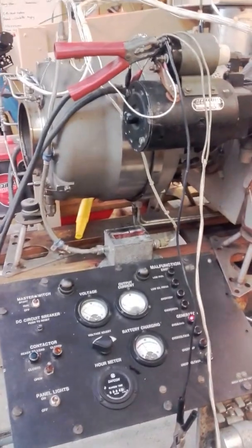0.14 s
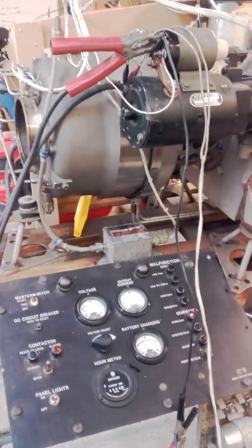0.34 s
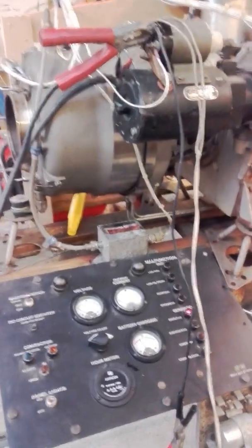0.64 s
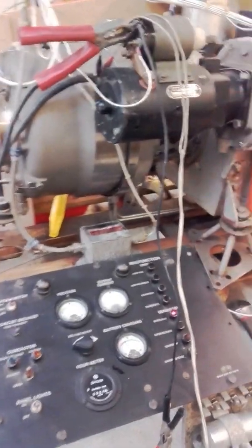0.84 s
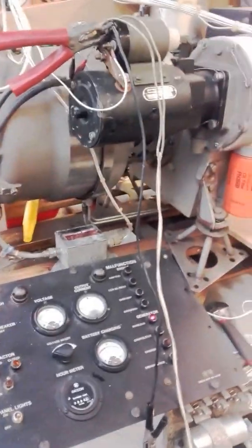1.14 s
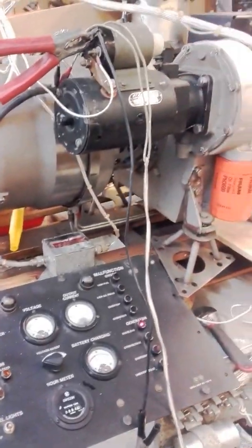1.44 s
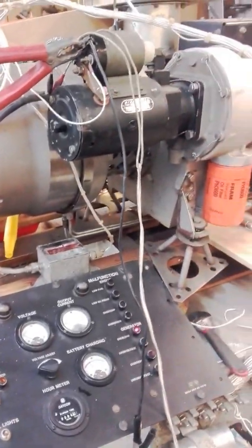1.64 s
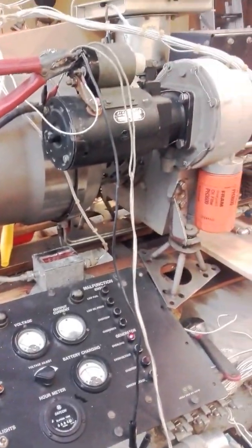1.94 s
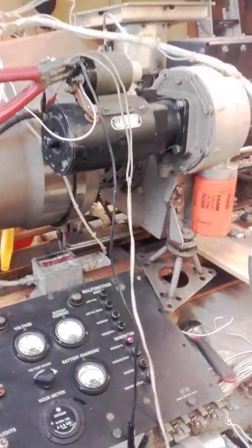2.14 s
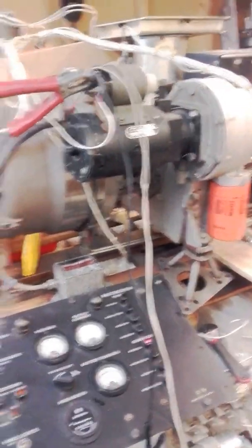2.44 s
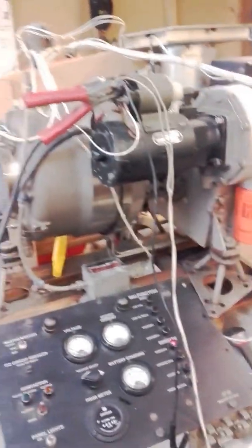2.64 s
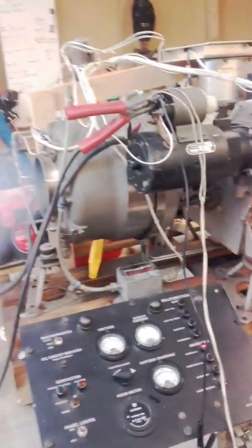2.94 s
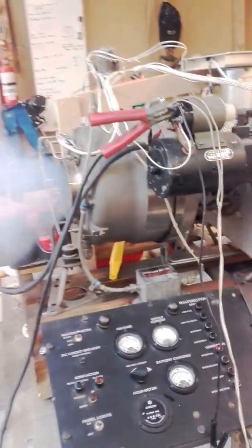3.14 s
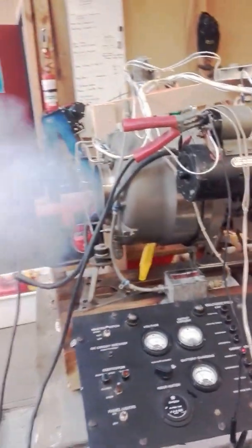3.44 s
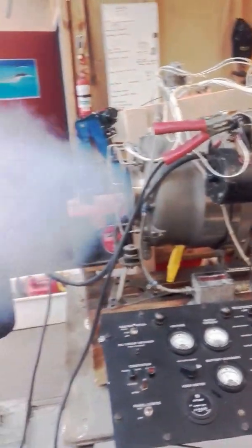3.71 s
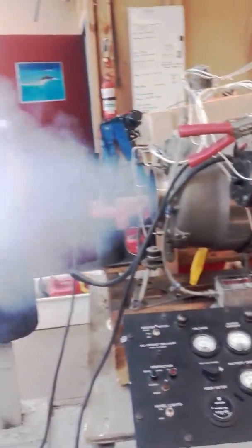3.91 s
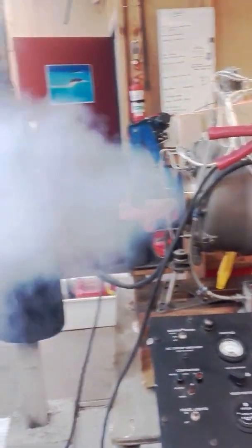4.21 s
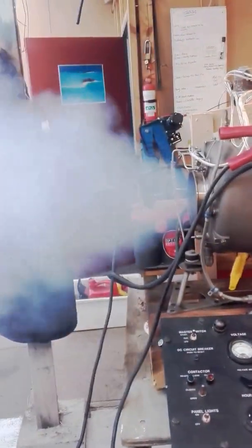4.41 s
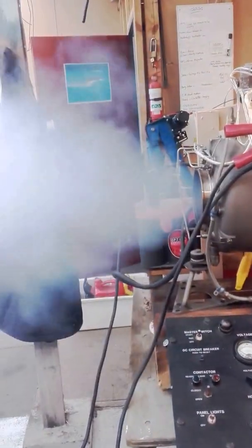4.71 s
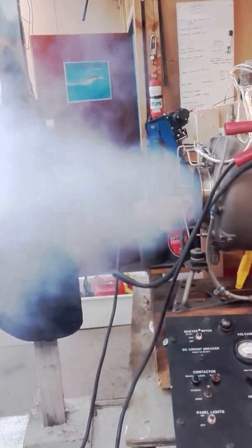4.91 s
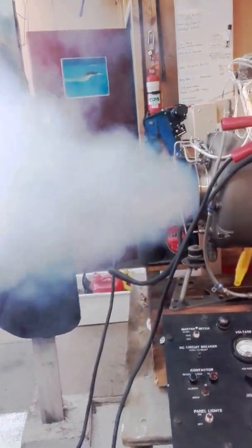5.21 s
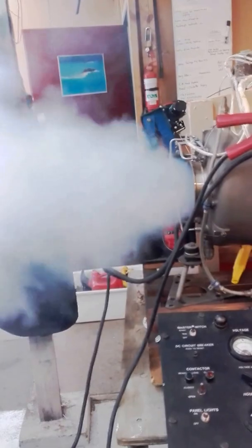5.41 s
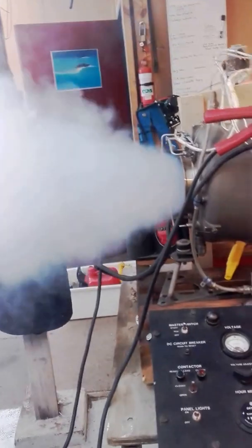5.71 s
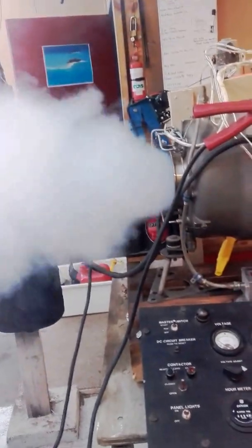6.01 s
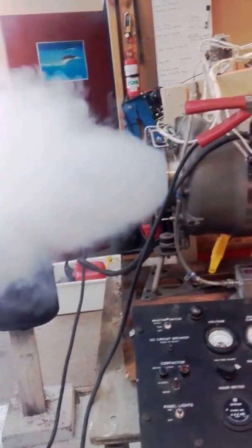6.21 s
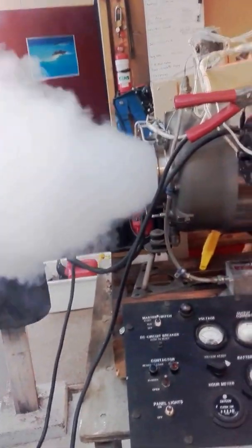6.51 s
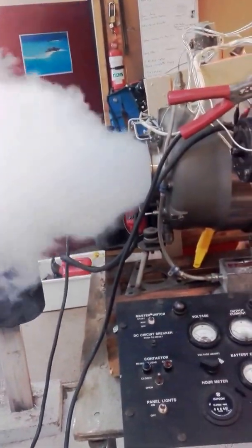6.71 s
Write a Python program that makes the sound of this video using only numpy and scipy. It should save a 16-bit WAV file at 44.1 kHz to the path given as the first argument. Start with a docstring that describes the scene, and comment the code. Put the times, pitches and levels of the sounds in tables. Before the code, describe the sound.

A small gas turbine winds down in a workshop, its high whine falling and fading over rushing air and a brief gear rattle.

```python
"""A small gas turbine coasts down in a workshop, close to the microphone.
From the start its rotor whines on a falling pitch, with overtones and gear tones; wall echoes make them
flutter, and air rushes through fixed duct resonances. The whine is loudest near 1.3 s. The unloaded
gear teeth rattle most near 3 s, as the microphone moves toward the exhaust and the rush turns hollow.
The rush dulls and fades; faint dry ticks sound in the last second."""
import sys
import numpy as np
from scipy import signal
from scipy.fft import rfft, irfft
from scipy.io import wavfile
from scipy.ndimage import uniform_filter1d, minimum_filter1d

SR = 44100
rng = np.random.default_rng(int(sys.argv[2]) if len(sys.argv) > 2 else 0)


def pcm_store(signal):
    """Save signal as 16-bit PCM."""
    levels = np.round(np.clip(np.atleast_2d(signal), -1, 1) * 32767)
    wavfile.write(sys.argv[1], SR, levels.astype(np.int16).T)


N = 302526
TIME_S = np.arange(N) / SR

# Once-per-turn whine. Each row: time in seconds, level in dB.
WHINE_LEVELS = [(0, -16.5), (.62, -13), (.74, -5.5), (.97, -8.5), (1.03, -18.5), (1.2, -4.5), (1.44, -4.8),
                (1.52, -14), (1.7, -20.5), (1.88, -13.5), (2.3, -18.5), (2.46, -16.5), (2.6, -22),
                (2.87, -20.5), (3.0, -26), (3.13, -22), (3.6, -41), (4.22, -37), (4.55, -40), (5.25, -59),
                (5.62, -39), (6.3, -85)]
# Harmonics 2 to 6. Each row: level at top speed in dB, loss in dB per halving of speed.
OVERTONE_LEVELS = [(-37, 18), (-28, 32), (-38.5, 13), (-41, 23), (-52, 23)]
# Resonances that harmonic 2, harmonic 3 and the gear mesh tone fall through.
# Each row: centre in Hz, width in Hz, lift in dB.
SECOND_RESONANCES = [(6010, 190, 10), (5558, 290, 19.5), (4880, 350, 17), (4020, 78, 10.5), (3590, 120, 14),
                     (3170, 134, 18), (2384, 180, 26.5), (2191, 160, 28)]
THIRD_RESONANCES = [(8960, 160, 5), (7820, 260, 7), (5640, 150, 9), (5260, 280, 15)]
MESH_RESONANCES = [(2640, 140, 15), (2213, 320, 23), (1860, 180, 14), (1600, 110, 10), (1420, 680, 9.5)]
# Geared accessories. Each row: multiple of rotor speed, peak time in seconds, swell in seconds, level in dB.
ACCESSORY_TONES = [(.164, 1.7, .25, -48), (.26, 3.9, .3, -56), (.686, 6.4, .4, -57), (.895, .85, .4, -27)]
# Air flow. Each row: time in seconds, roar gain in dB, duct howl gain in dB, hiss gain in dB.
FLOW_GAINS = [(0, 2, 6, 7.5), (1.1, 7, 7.5, 9), (1.8, 7.5, 5, 7.5), (3.3, 4, 3.5, 2.6), (4.7, -2, -2, -5.5),
              (6.86, -11, -12, -15)]
# Smooth spectrum of the air. Each row: frequency in Hz, level in dB.
RUSH_SPECTRUM = [(25, -57), (65, -62), (110, -41.5), (250, -35), (500, -32), (1000, -37), (2000, -22.5),
                 (3200, -35), (4400, -30), (7500, -27), (9300, -30), (11000, -38), (13500, -43),
                 (15500, -40)]
# Ducts and casing. Each row: centre in Hz, width in Hz, lift in dB beside the engine, same at the exhaust.
DUCT_RESONANCES = [(427, 190, 0.5, 5), (610, 114, 4.5, 2.5), (741.6, 127, 12, 16.5), (957, 105, 11, 19),
                   (1180, 174, 16, 12), (1360, 148, 13, 5), (2157, 144, 9, 12.5), (2393, 505, 11, 8),
                   (2907, 480, 9, 3), (3578, 357, 16, 15), (5930, 57, 6, 2), (7150, 270, 6, 1.5),
                   (8910, 1180, 4, 4)]
# Microphone path. Each row: time in seconds, position from 0 (beside the engine) to 1 (exhaust).
MIC_PATH = [(2.5, 0), (3.9, 0.87)]
# Dry ticks. Each row: start in seconds, level in dB.
TICK_EVENTS = [(5.892, -38), (5.93, -46), (6.07, -42), (6.168, -48), (6.222, -51), (6.315, -45),
               (6.35, -52), (6.588, -41), (6.732, -54)]
# Nearest surfaces. Each entry: echo delay in seconds.
ECHO_DELAYS_S = [.009252, .01229, .024376]


def rotor(top_hz=3021, drag_per_s=.1682, friction_per_s2=.00412, wobble=.00015):
    """Drag and friction slow the shaft. Returns speed in Hz, halvings of speed, angle in radians."""
    speed_hz = top_hz * np.exp(-(drag_per_s + friction_per_s2 * TIME_S) * TIME_S)
    angle_rad = 2 * np.pi * np.cumsum(speed_hz * (1 + wobble * drift(rate_hz=25))) / SR
    return speed_hz, np.log2(top_hz / speed_hz), angle_rad


def rotor_whine(angle_rad, shimmer_db=2.56, echo_share=.25):
    """Once-per-turn tone. Turbulence makes it shimmer and near echoes beat with it, more when it is weak."""
    level_db = curve(WHINE_LEVELS, TIME_S)
    unrest = np.interp(level_db, [-18, -9], [1, .3])
    direct = tone(level_db + unrest * shimmer_db * drift(rate_hz=24), angle_rad)
    echoes = sum(np.pad(direct, (round(delay_s * SR), 0))[:N] for delay_s in ECHO_DELAYS_S)
    return direct + echo_share * unrest * echoes


def overtones(speed_hz, halvings, angle_rad, octave_fading_db=3.0, upper_fading_db=2.5):
    """Rotor harmonics. Each fades in and out as its reflections cancel and add."""
    out = np.zeros(N)
    resonances = {2: SECOND_RESONANCES, 3: THIRD_RESONANCES}
    for k, (top_db, loss_db) in enumerate(OVERTONE_LEVELS, 2):
        level_db = top_db - loss_db * halvings + lift_db(resonances.get(k, []), k * speed_hz)
        fading_db = (octave_fading_db if k == 2 else upper_fading_db) * drift(rate_hz=36)
        out += tone(level_db + fading_db, k * angle_rad)
    return out


def gear_mesh(speed_hz, halvings, angle_rad, ratio=1.367, top_db=-41.5, loss_db=10.9):
    """Mesh tone, locked to the shaft. Play between the teeth roughens it."""
    level_db = top_db - loss_db * halvings + lift_db(MESH_RESONANCES, ratio * speed_hz)
    fading_db = 2.5 * drift(rate_hz=68)
    jitter_rad = .73 * drift(rate_hz=40)
    return tone(level_db + fading_db, ratio * angle_rad + jitter_rad)


def accessories(angle_rad, fading_db=2):
    """Geared accessories. Each faint tone swells once."""
    out = np.zeros(N)
    for ratio, peak_s, swell_s, level_db in ACCESSORY_TONES:
        swell = np.exp(-((TIME_S - peak_s) / swell_s) ** 2)
        out += swell * tone(level_db + fading_db * drift(rate_hz=23), ratio * angle_rad)
    return out


def air_rush(rumble_share=.7, fizz_share=1.4, ripple_db=1.52, eddy_db=.77, gust_db=.51):
    """Turbulence rings the ducts. As the flow weakens, the top of the hiss dies fastest."""
    size, hop = 2048, 512
    hz = np.fft.rfftfreq(size, 1 / SR)
    frames_s = np.arange(N // hop + 5) * hop / SR
    roar_db, howl_db, hiss_db = (curve(FLOW_GAINS, frames_s, column) for column in (1, 2, 3))
    zones = [(250, rumble_share * hiss_db), (550, roar_db), (1600, roar_db), (2000, howl_db),
             (2600, howl_db), (4300, hiss_db), (9000, hiss_db), (12500, fizz_share * hiss_db)]
    centres_hz, gains_db = zip(*zones)
    flow_db = np.array([spectrum(list(zip(centres_hz, frame)), hz) for frame in np.transpose(gains_db)])
    field_db = spectrum(RUSH_SPECTRUM, hz) + flow_db
    position = curve(MIC_PATH, frames_s)[:, None]
    for centre_hz, width_hz, beside_db, exhaust_db in DUCT_RESONANCES:
        peak_db = beside_db + position * (exhaust_db - beside_db)
        field_db += lift_db([(centre_hz, width_hz, peak_db)], hz)
    standing_waves = unit(uniform_filter1d(rng.standard_normal(len(hz)), size=2))
    eddies = uniform_filter1d(rng.standard_normal(field_db.shape), size=10, axis=0)
    eddies = unit(uniform_filter1d(eddies, size=24, axis=1))
    field_db += ripple_db * standing_waves + eddy_db * eddies
    noise = rng.standard_normal((len(frames_s) - 1) * hop)
    bins = signal.stft(noise, nperseg=size, noverlap=size - hop)[2]
    rush = signal.istft(bins * amp(field_db.T), nperseg=size, noverlap=size - hop)[1][:N]
    return rush * amp(gust_db * drift(rate_hz=33))


def gear_rattle(knocks_per_s=45, spread_db=3, peak_s=2.9, peak_db=-19, fade_db_per_s=7,
                ring_hz=2264, rise_s=.001, t60_s=.032):
    """Unloaded teeth knock at random across their play. Each knock rings the casing."""
    knocks = (rng.random(N) < knocks_per_s / SR) * amp(spread_db * rng.standard_normal(N))
    knocks *= amp(peak_db - fade_db_per_s * abs(TIME_S - peak_s))
    t = np.arange(SR // 10) / SR
    ring = (1 - np.exp(-t / rise_s)) * amp(-60 * t / t60_s) * np.sin(2 * np.pi * ring_hz * t)
    return signal.oaconvolve(knocks, ring / abs(ring).max())[:N]


def ticks(rise_s=.0046, decay_s=.018, band_hz=(4500, 8000)):
    """Short bright noise bursts with a soft start."""
    t, out = np.arange(SR // 10) / SR, np.zeros(N)
    band = signal.butter(1, band_hz, "bandpass", fs=SR)
    envelope = (1 - np.exp(-t / rise_s)) * np.exp(-t / decay_s)
    for start_s, level_db in TICK_EVENTS:
        burst = envelope * unit(signal.lfilter(*band, rng.standard_normal(len(t))))
        slot = out[round(start_s * SR):][:len(t)]
        slot += amp(level_db) * burst[:len(slot)]
    return out


def wall_echoes(x, t60_s=.42, echoes_per_s=2000, gap_s=.012):
    """Dense echoes carry the higher pitch of a moment ago and beat with the direct tone."""
    t = np.arange(SR // 2) / SR
    taps = rng.choice([-1., 1.], len(t)) * (rng.random(len(t)) < echoes_per_s / SR)
    taps *= (t > gap_s) * amp(-60 * t / t60_s)
    return signal.fftconvolve(x, taps / np.linalg.norm(taps))[:N]


def amp(db):
    """Decibels to gain."""
    return 10 ** (np.asarray(db) / 20)


def unit(x):
    """Scales to rms 1."""
    return x / np.sqrt(np.mean(x ** 2) + 1e-20)


def tone(rms_db, phase_rad):
    """Sine at an rms level."""
    return np.sqrt(2) * amp(rms_db) * np.sin(phase_rad)


def lift_db(resonances, hz):
    """Gain from the resonances near a frequency."""
    return sum(db / (1 + (2 * (hz - centre_hz) / width_hz) ** 2) for centre_hz, width_hz, db in resonances)


def curve(rows, time_s, column=1):
    """One table column, interpolated in time."""
    rows = np.asarray(rows)
    return np.interp(time_s, rows[:, 0], rows[:, column])


def spectrum(points, hz):
    """Joins (Hz, dB) points on a log-frequency axis."""
    points_hz, points_db = np.transpose(points)
    return np.interp(np.log(hz + 1), np.log(points_hz + 1), points_db)


def drift(rate_hz):
    """Smooth noise of rms 1, rolling off at the rate."""
    hz = np.fft.rfftfreq(N, 1 / SR)
    return unit(irfft(rfft(rng.standard_normal(N)) * np.exp(-(hz / rate_hz) ** 2), N))


def scene(whine_wet_db=-16, tones_wet_db=-8):
    """One microphone on both channels. The whine reaches it most directly."""
    speed_hz, halvings, angle_rad = rotor()
    whine = rotor_whine(angle_rad)
    tones = overtones(speed_hz, halvings, angle_rad)
    tones += gear_mesh(speed_hz, halvings, angle_rad) + accessories(angle_rad)
    echoes = wall_echoes(amp(whine_wet_db) * whine + amp(tones_wet_db) * tones)
    mono = whine + tones + echoes + air_rush() + gear_rattle() + ticks()
    return np.array([mono, mono])


def record(dry, threshold_db=-13.5, duck_db_per_db=.38, ceiling=.9, cutoff_hz=15800):
    """Gain control ducks the mix at the loudest whine; then peak limiter and low-pass."""
    power_db = 10 * np.log10(abs(uniform_filter1d(dry[0] ** 2, size=1500)) + 1e-12)
    excess_db = uniform_filter1d(np.maximum(power_db - threshold_db, 0), size=1000)
    ducked = dry * amp(-duck_db_per_db * excess_db)
    limiter_gain = ceiling / np.maximum(abs(ducked).max(axis=0), ceiling)
    limited = ducked * uniform_filter1d(minimum_filter1d(limiter_gain, size=600), size=500)
    lowpass = signal.firwin(701, cutoff_hz, window=("kaiser", 9), fs=SR)
    return signal.oaconvolve(limited, lowpass[None], "same")


dry = scene()
out = record(dry)
pcm_store(out)
```